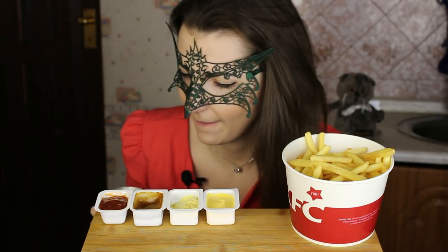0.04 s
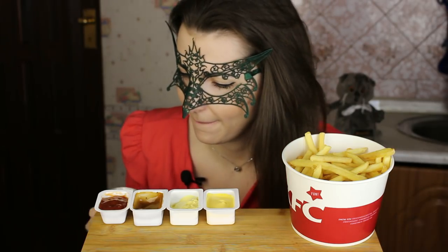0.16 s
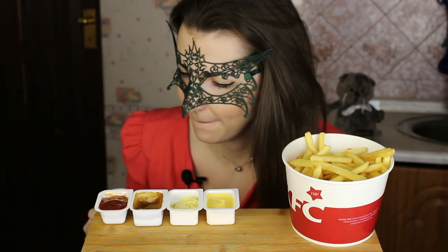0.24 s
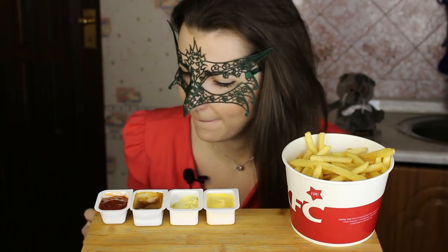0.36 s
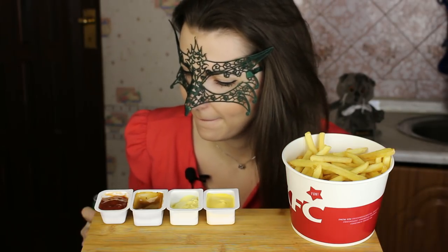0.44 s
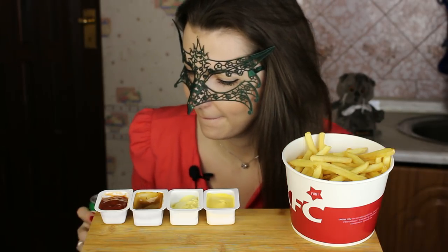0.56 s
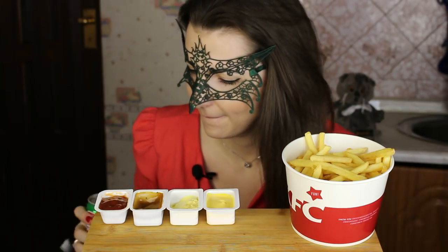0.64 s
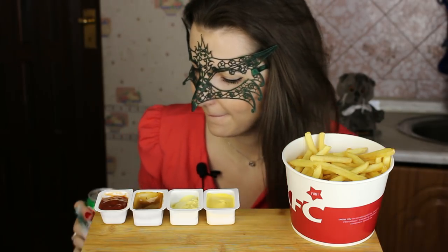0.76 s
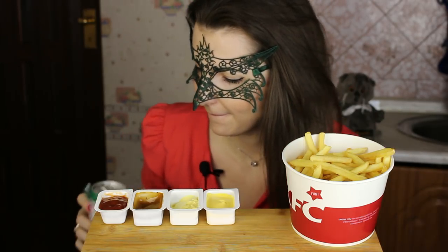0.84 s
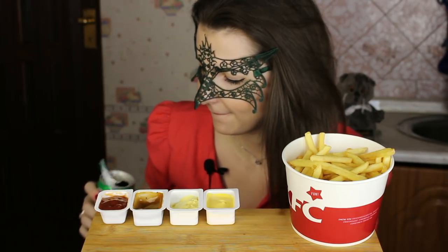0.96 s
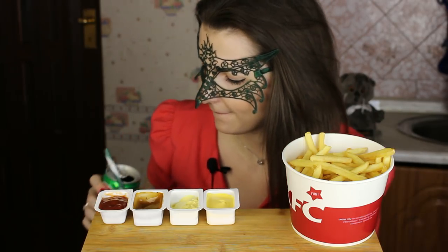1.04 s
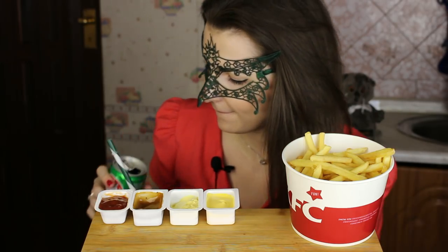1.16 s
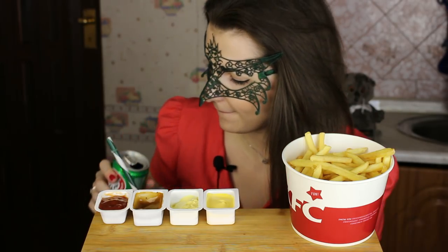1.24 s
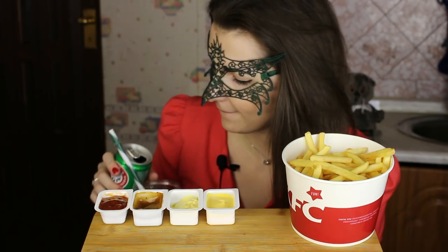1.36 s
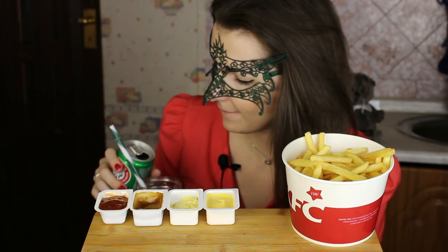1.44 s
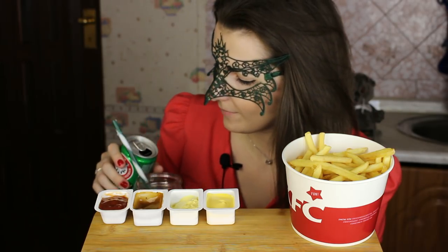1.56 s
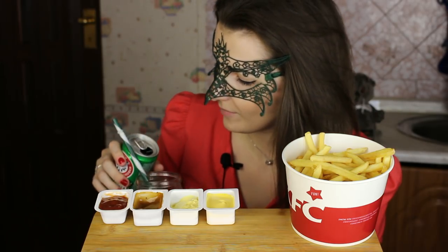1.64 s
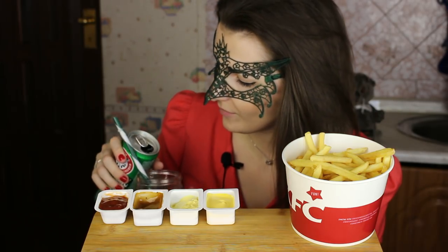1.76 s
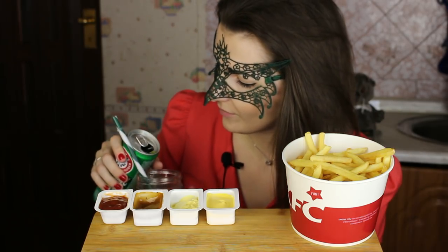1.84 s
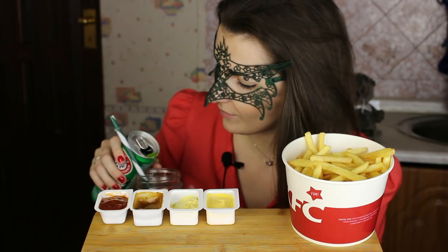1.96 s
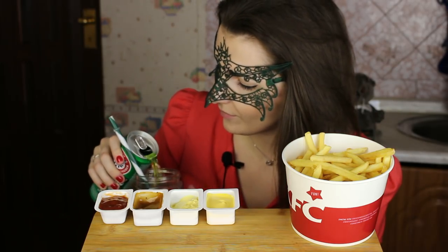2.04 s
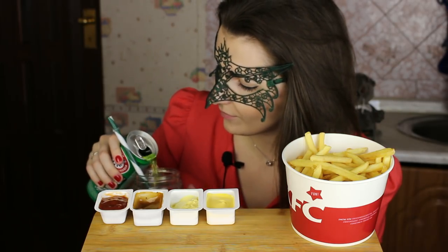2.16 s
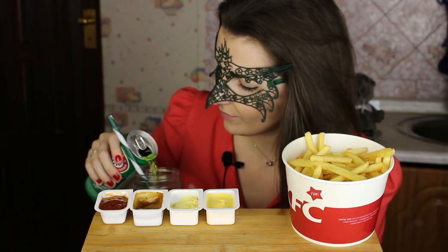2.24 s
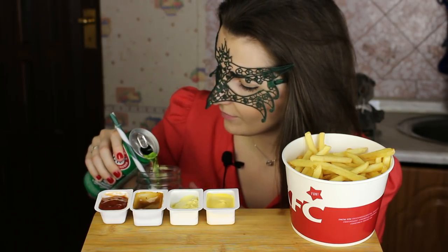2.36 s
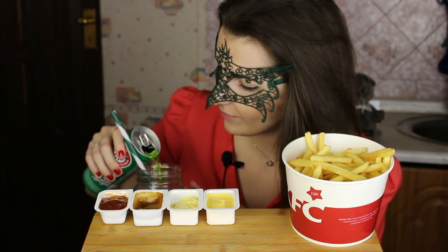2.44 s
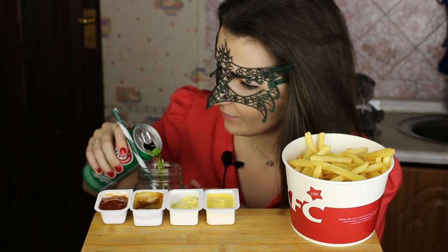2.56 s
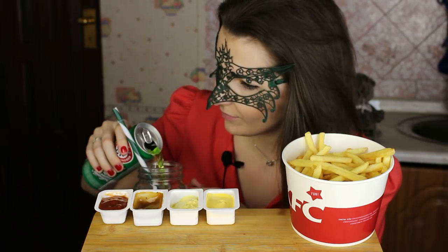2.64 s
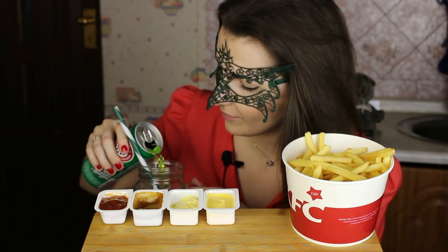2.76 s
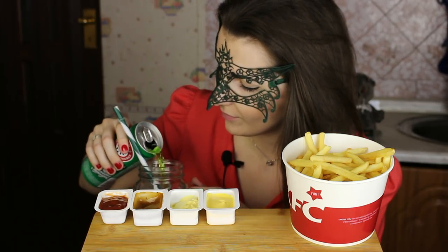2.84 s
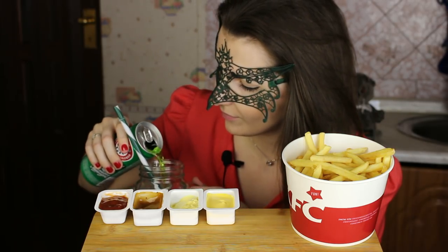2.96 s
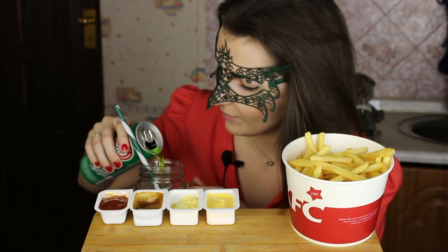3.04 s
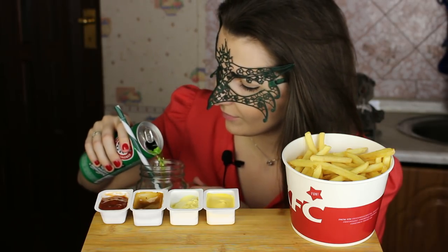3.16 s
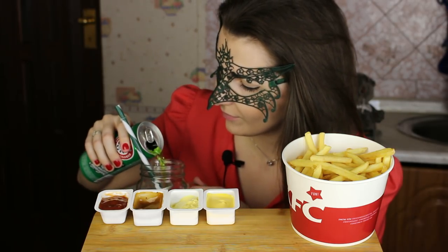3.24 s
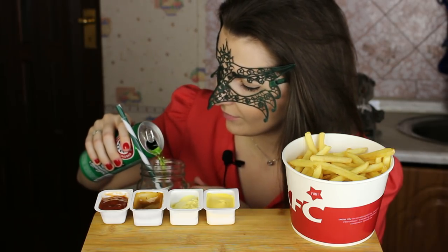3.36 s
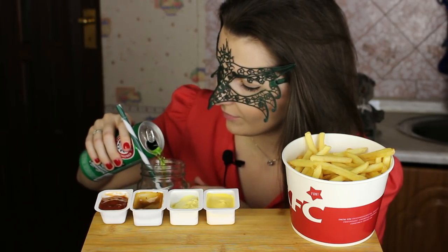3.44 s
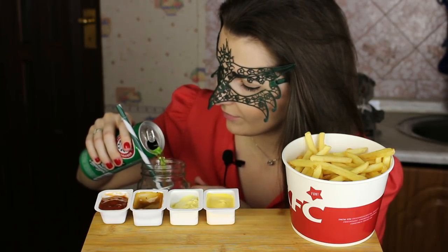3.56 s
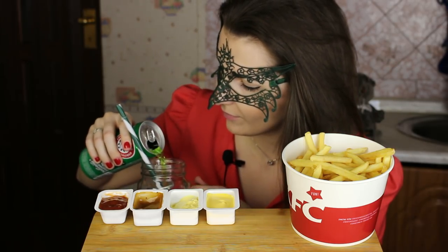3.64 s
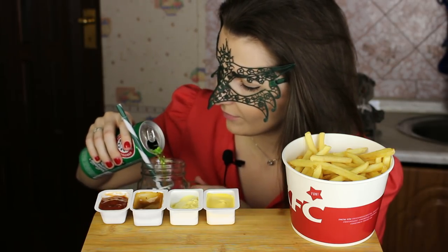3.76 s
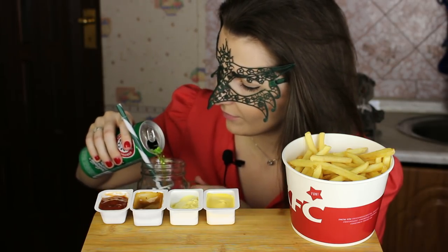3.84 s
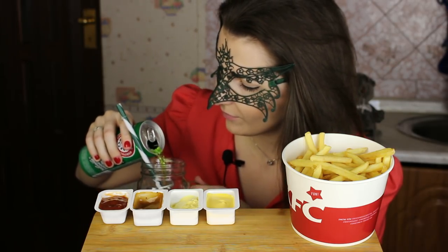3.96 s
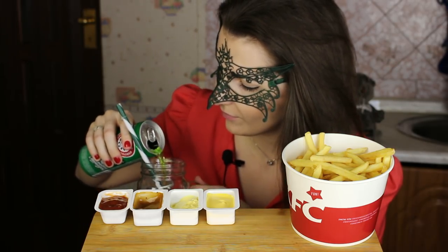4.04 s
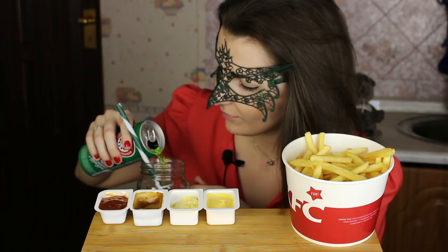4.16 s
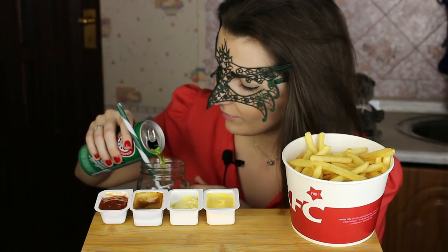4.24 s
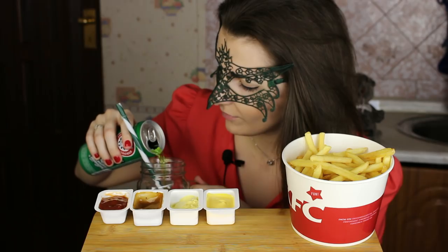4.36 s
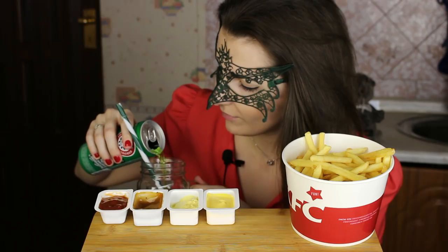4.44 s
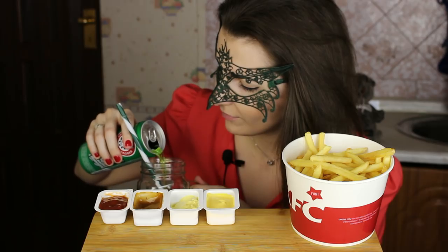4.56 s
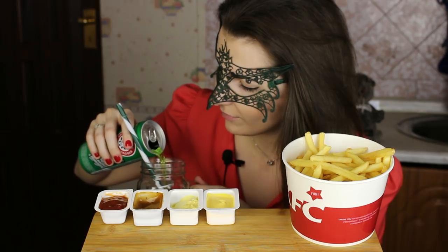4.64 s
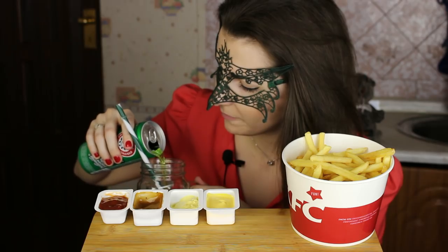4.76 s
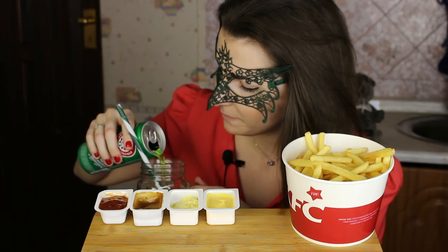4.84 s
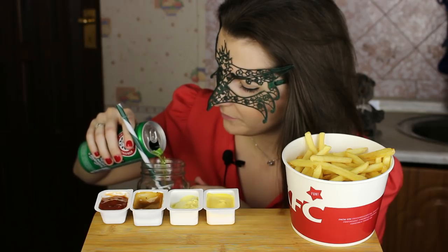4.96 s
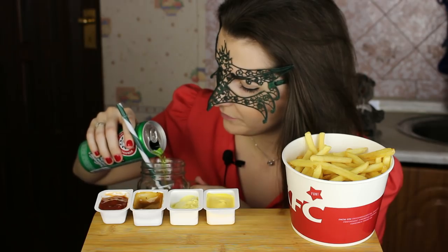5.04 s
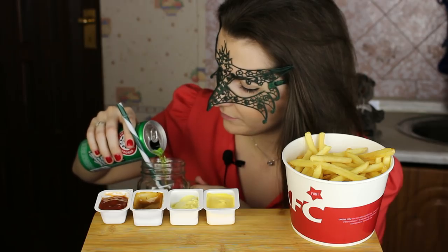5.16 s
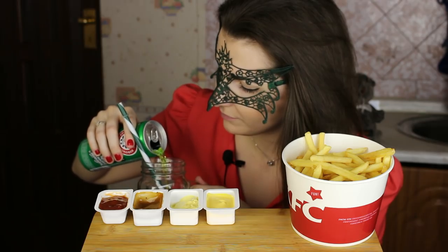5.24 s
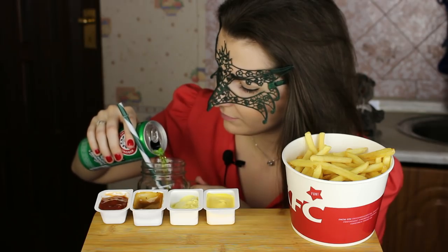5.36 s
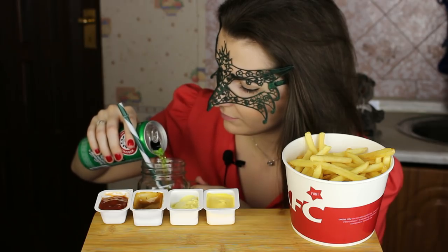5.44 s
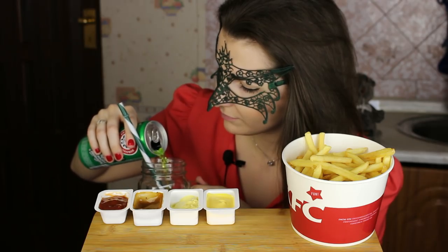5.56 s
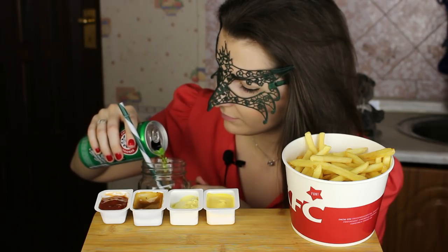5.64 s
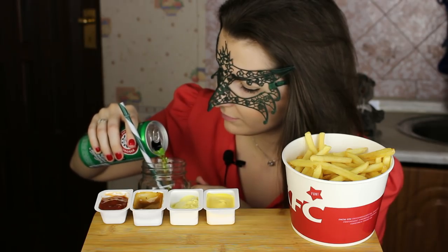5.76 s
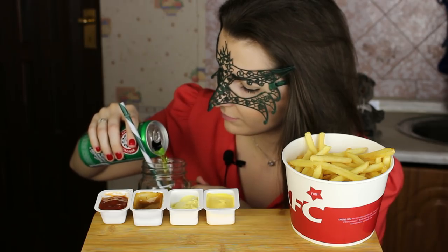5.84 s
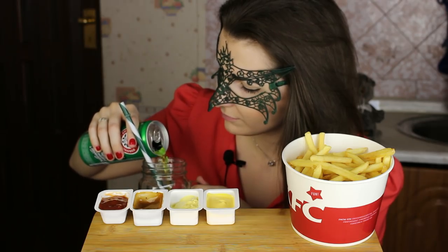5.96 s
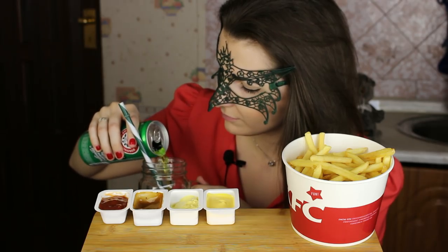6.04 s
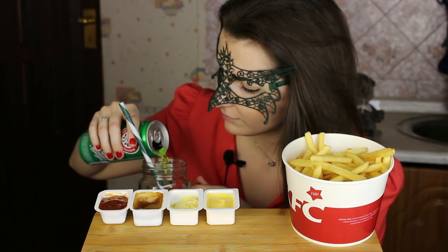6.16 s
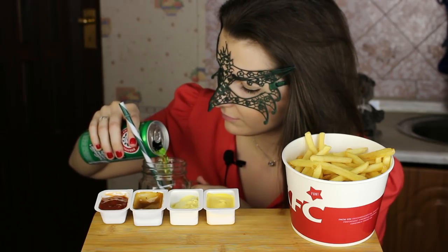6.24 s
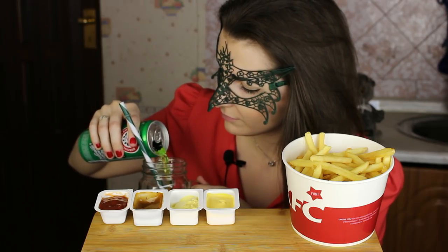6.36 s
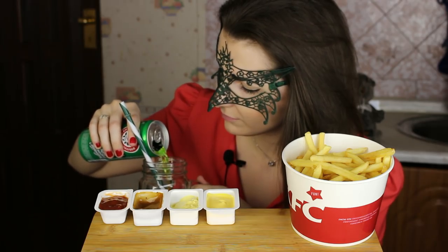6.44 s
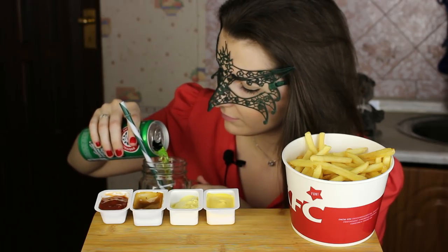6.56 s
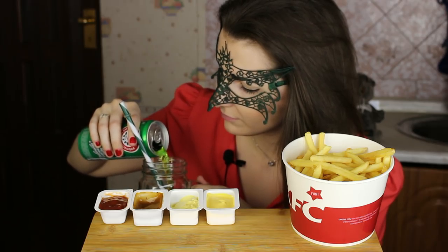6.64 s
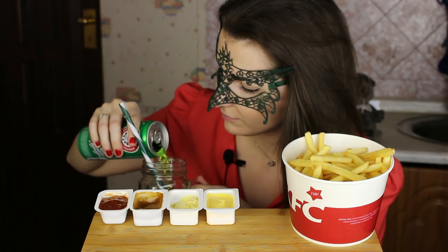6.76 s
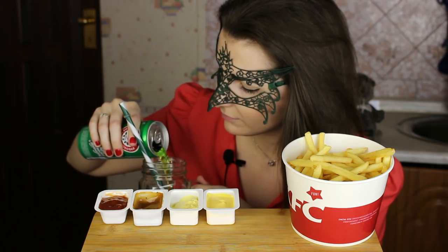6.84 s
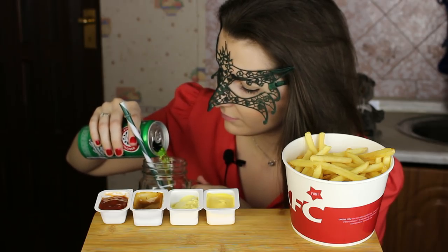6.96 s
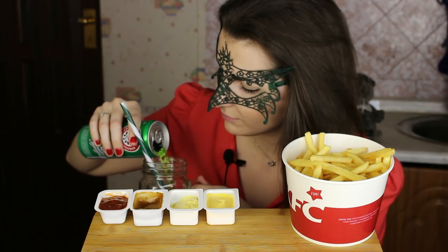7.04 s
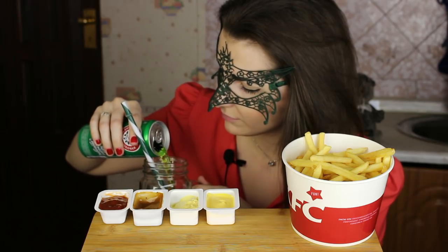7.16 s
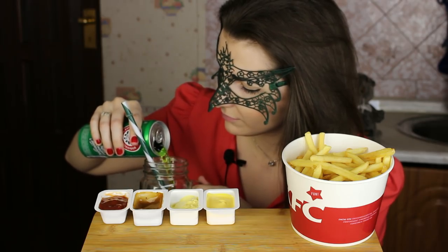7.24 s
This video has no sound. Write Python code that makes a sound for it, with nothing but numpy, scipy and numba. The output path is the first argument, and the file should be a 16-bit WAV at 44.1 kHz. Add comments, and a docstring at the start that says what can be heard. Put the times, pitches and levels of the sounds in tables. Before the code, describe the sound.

A quiet kitchen with faint hush and hiss, heard close to one microphone with a short, soft room reflection. From 0 to about 0.6 seconds a glass jar is slid over a table in four quick shoves: low rumble, light scraping and clear glassy clinks. Between 0.85 and 2.1 seconds come scattered hollow taps and small hard ticks of can and jar, then a brief soft hum of the jar's air. From 2.2 the first drops splat on bare glass, thickening around 2.6 to 3.2 into crisp, bright spattering and little knocks. At about 3.4 the stream catches, and big bubbles glug fast and hollow, loudest from 3.7 to 4.6. Foam hiss and fine crackle sit above, smoothing out. After 5.2 the gurgling loosens; from 6.2 it is a softer trickle, with the jar's note rising noticeably towards 7.3, still fizzing as it ends.

```python
"""Over the hush of a quiet kitchen, a glass jar is slid and carried over a table: rubbing noise excites
the table's resonances, and taps excite the glass wall and the enclosed air.
Fizzy drink is then poured from a can: the first drops splat on bare glass as short noise puffs.
The stream traps big bubbles, damped sines that ring the air column; its pitch climbs as the jar fills,
under a hiss of bursting foam. All is heard close to one microphone."""
import sys
import numpy as np
from scipy import signal
from scipy.fft import rfft, irfft, next_fast_len
from scipy.io import wavfile
from scipy.ndimage import uniform_filter1d, map_coordinates
from numba import njit

SR = 44100
rng = np.random.default_rng(int(sys.argv[2]) if len(sys.argv) > 2 else 0)


def dump_mix(stems):
    """Bounce the given channels to the path in sys.argv[1] as a 16-bit WAV at rate SR."""
    frames = np.atleast_2d(stems).T  # one column per channel
    limited = np.clip(frames, -1, 1)  # hard clip at full scale
    pcm = np.round(limited * 32767).astype(np.int16)
    wavfile.write(sys.argv[1], SR, pcm)


def volts_from_db(level):
    """Convert decibel levels to linear amplitude ratios."""
    exponent = np.asarray(level, float) / 20
    return 10 ** exponent


N = 322371  # length in samples

# Electronic hiss, spectral shape: f/Hz, relative level/dB
SELF_SPECTRUM = [(12, -32), (20, 4), (349, 1), (646, -3), (10600, -10), (14900, -6), (16200, -5.5)]
# Kitchen hush, spectral shape: f/Hz, relative level/dB
HUSH_SPECTRUM = [(12, -48), (20, 1), (127, 0.5), (358, -5), (561, -0.5), (683, -9), (956, -9), (1160, -7.5),
                 (1720, -12.5), (8270, -15), (9510, -10.5), (14900, -17.5), (16200, -28)]
SELF_RMS_DB, HUSH_RMS_DB = -65.5, -54.5
TOP_HZ = 15900  # nothing passes above

# Shoves of the jar over the table: t/s, hold/s, table rumble level/dB, scrape level/dB
SHOVES = [(.01, 0.11, -57, -55), (0.176, 0.072, -43, -48.5), (.3, 0.12, -50.5, -54),
          (0.446, .075, -42.5, -49.5)]
SHOVE_ATTACK_S, SHOVE_T60_S = 0.019, 0.31
# Modes of the table: f/Hz, relative level/dB
TABLE_MODES = [(81, 1), (122, -6), (163, -3.5)]
# Resonances of the scrape: f/Hz, width/Hz, relative level/dB
SCRAPE_MODES = [(690, 390, 10), (1320, 300, -7), (5760, 72, 5), (6340, 76, -1), (7240, 90, 0),
                (8240, 78, -10), (12300, 330, 1), (9000, 24000, -6)]
# Taps on the jar as it is carried: t/s, air level/dB, glass level/dB
TAPS = [(.09, -52, -65), (.207, -44, -39.5), (.248, -48, -49), (0.346, -48.5, -41), (.47, -50, -57),
        (0.858, -46.5, -66), (.885, -44, -55), (.945, -44.5, -54), (1.068, -66, -58), (1.302, -49, -53),
        (1.353, -40, -69), (1.378, -59, -58), (1.566, -45, -53.5), (1.681, -51, -66), (1.944, -54, -80),
        (2.039, -54, -61)]
AIR_T60_S, GLASS_T60_S = 0.23, 0.27
# Modes of the glass wall: f/Hz, relative level/dB
GLASS_MODES = [(3060, 3), (2895, -8.5), (6200, -12)]
# Small ticks of can and jar: t/s, peak level of the ping/dB, centre f/Hz
TICKS = [(0.207, -40.5, 3060), (0.474, -56, 743), (1.071, -43, 9450), (1.721, -37.5, 2350),
         (1.893, -47, 940), (1.974, -48, 940), (2.024, -37.5, 950), (2.029, -37, 900), (2.093, -46, 867)]
# Swells of the jar's air into a soft hum: t/s, length/s, level at the crest/dB
HUMS = [(2.156, 0.064, -37), (2.225, 0.068, -50)]

# Air column above the drink: t/s, first mode f/Hz, second mode f/Hz
AIR_MODES = [(0, 565, 1900), (3.3, 558.8, 2020), (4.2, 576.2, 2200), (5.1, 609.4, 2360), (6.2, 619.6, 2360),
             (7.31, 716, 2570)]
NECK_HZ = 2520  # the neck halves the amplitude here
# The stream: t/s, small bubbles level/dB, patter level/dB
POUR = [(2.3, -72, -84), (2.58, -70, -66), (2.77, -55.5, -56.5), (3.02, -46.5, -49.5), (3.3, -51, -54),
        (3.42, -42.5, -55.5), (3.5, -36.5, -47.5), (3.62, -32.5, -56.5), (4.52, -30.5, -51),
        (4.8, -31, -50), (5.42, -36.5, -43.5), (5.9, -36, -46.5), (6.2, -48.5, -54), (7.31, -44, -53.5)]
# Drops bursting on glass and foam: t/s, peak level before the mouth's colour/dB, centre f/Hz
SPLATS = [(2.232, -36.5, 6640), (2.414, -29, 11400), (2.563, -31, 13000), (2.607, -22, 9200),
          (2.64, -23, 12400), (2.725, -22.5, 12800), (2.794, -15.5, 12900), (2.834, -18.5, 11000),
          (2.844, -15, 13100), (2.893, -13, 9600), (2.9, -14, 8000), (2.938, -20, 11800),
          (2.997, -17, 12000), (3.018, -18, 13900), (3.058, -17, 13800), (3.09, -17, 11900),
          (3.122, -22, 6340), (3.142, -18, 12100), (3.175, -22, 13500), (3.193, -20.5, 11900),
          (3.281, -20.5, 8800), (3.514, -23, 12000), (3.616, -19.5, 13500), (3.687, -24, 11700),
          (3.769, -25, 12200), (3.967, -22, 13700), (3.995, -12.5, 11700), (4.241, -28, 12100),
          (4.265, -25, 5030), (4.287, -23.5, 9660), (4.497, -21, 7100), (4.568, -18.5, 12300),
          (5.039, -22.5, 10000), (5.088, -21, 9860), (5.611, -24, 12300), (5.644, -25, 9600),
          (5.708, -20, 12300), (5.743, -15.5, 12100), (5.9, -26, 12400)]
# Drops that knock the lower voice of the jar: t/s, peak level/dB, centre f/Hz
KNOCKS = [(2.563, -41.5, 1950), (2.601, -34, 2030), (2.626, -39, 1950), (2.66, -38, 1950),
          (2.684, -34.5, 1900), (2.722, -33.5, 1350), (2.744, -26, 1340), (2.816, -33, 1940),
          (2.852, -31, 1420), (2.895, -28.5, 1980), (2.999, -21.5, 1560), (3.005, -28, 1480),
          (3.016, -29, 1500), (3.049, -22.5, 1300), (3.091, -29.5, 1960), (3.195, -29.5, 2060)]
# Foam that builds up, then holds: t/s, hiss level before the mouth's colour/dB
FIZZ = [(2.1, -69), (2.3, -62), (2.77, -47.5), (3.05, -46), (5.5, -42.5), (6.2, -43.5), (7.31, -42)]
# Colour that the mouth of the jar gives: f/Hz, gain/dB
MOUTH_COLOUR = [(1530, -2.5), (2600, -7.5), (2980, -12), (3150, -7), (3810, -1.5), (4340, -7.5),
                (5180, 1.5), (6270, -5.5), (8990, -2), (10800, -4.5), (11800, 0), (12500, 2), (13700, -3),
                (15100, -2), (16200, -24)]
# Spitting over the hiss; thick foam smothers it
SPIT_DB, SPIT_FROM_S, SPIT_FALL_DB_PER_S = 3.5, 2.7, 4

# Big trapped bubbles: t/s, level of the damped sine/dB, f/Hz, plop level over the bubble/dB
GLUGS = [(2.744, -32, 597, 4), (2.852, -38.5, 553, 6), (3.049, -24.5, 560, -1), (3.22, -32, 550, 5),
         (3.32, -30.5, 567, -1.5), (3.443, -23.5, 564, 1), (3.471, -16, 596, -2.5), (3.514, -23, 647, -10),
         (3.551, -21, 552, 1), (3.584, -12.5, 620, -10.5), (3.604, -12.5, 630, -12.5),
         (3.726, -6, 600, -11.5), (3.774, -13.5, 646, -13), (3.794, -14.5, 580, -32),
         (3.813, -10, 620, -34), (3.828, -12.5, 596, -30), (3.862, -20, 595, -26), (3.887, -9.5, 620, -20),
         (3.93, -19, 600, -13), (3.944, -6, 643, -12), (3.969, -13.5, 590, -14), (3.996, -7.5, 627, -15),
         (4.017, -8.5, 638, -22), (4.056, -7, 613, -17), (4.079, -14.5, 590, -24), (4.1, -18, 554, -18),
         (4.12, -2.5, 610, -26), (4.137, -13, 588, -20), (4.156, -10.5, 615, -37), (4.191, -16.5, 623, -31),
         (4.246, -6.5, 625, -25), (4.269, -11, 635, -16), (4.288, -3, 640, -19), (4.309, -8, 603, -26),
         (4.363, -19, 606, -15), (4.389, -10, 620, -30), (4.404, -15, 610, -26), (4.447, -18, 620, -30),
         (4.469, -9, 590, -29), (4.497, -7.5, 626, -16), (4.518, -7, 616, -29), (4.539, -3.5, 610, -24),
         (4.553, -9.5, 555, -21), (4.571, -10.5, 547, -13), (4.596, -12, 610, -28), (4.634, -13, 570, -23),
         (4.644, -15, 596, -16), (4.675, -14.5, 606, -19), (4.716, -19, 590, -10), (4.766, -10, 610, -16),
         (4.805, -11.5, 613, -29), (4.847, -16.5, 607, -31), (4.902, -8, 590, -26), (4.988, -14, 594, -22),
         (5.04, -18, 573, -26), (5.058, -12.5, 624, -22), (5.077, -7.5, 573, -19), (5.09, -7.5, 587, -17),
         (5.102, -8, 635, -23), (5.161, -15.5, 590, -25), (5.233, -19, 595, -14), (5.295, -18.5, 590, -9),
         (5.311, -20, 620, -25), (5.326, -13, 580, -29), (5.401, -13, 604, -34), (5.42, -13, 636, -17),
         (5.455, -12, 580, -14), (5.503, -12, 620, -28), (5.529, -18.5, 600, -19), (5.583, -18, 607, -22),
         (5.632, -20.5, 515, -7.5), (5.709, -12.5, 614, -24), (5.743, -19, 610, -20),
         (5.839, -21, 610, -14), (5.885, -23.5, 655, -9), (6.067, -23, 614, -15), (6.125, -23.5, 654, -19),
         (6.168, -16, 606, -10), (6.351, -26.5, 620, -37), (6.397, -32, 666, -5), (6.462, -24.5, 680, -6),
         (6.642, -29, 618, -15), (6.708, -35, 650, 1), (6.904, -23, 730, -17), (6.925, -24.5, 736, -14),
         (7.116, -24.5, 740, -18)]
# Bubble cloud in the deepening drink: t/s, f/Hz, level over the small bubbles/dB
CLOUD = [(3.3, 594, -40), (5, 522, 0), (5.8, 441.5, -3.5), (6.4, 361, -8.5), (7.31, 305, -12.5)]
# Middling bubbles at random times: level and its scatter over the small ones, relative pitch spread
MIDDLING_DB, MIDDLING_SCATTER_DB, MIDDLING_SPREAD = 4.5, 2.5, 0.09
DEEPEST_HZ = 233  # few bubbles are big enough to sound below: half amplitude here


def unit(x):
    """Normalisation: scales a signal to rms 1."""
    return x / np.sqrt(np.mean(x ** 2) + 1e-20)


def curves(rows, outside=None):
    """Linear interpolation: one value per sample for each column after the time."""
    times, *columns = np.transpose(rows)
    return [np.interp(np.arange(N) / SR, times, c, outside, outside) for c in columns]


def wobble(rate):
    """Band-limited random process: a smooth curve through `rate` random knots a second."""
    knots = rng.standard_normal(int(N * rate / SR) + 4)
    return map_coordinates(knots, [np.arange(N) * rate / SR])


def tone(hz, wander):
    """Phase diffusion: a sine of rms 1 whose phase drifts at random by about `wander` radians."""
    phase = np.cumsum(2 * np.pi * hz / SR)
    return np.sqrt(2) * np.sin(phase + wander * wobble(40.04))


def filtered(x, response):
    """Linear filtering: multiplies the spectrum by a complex response of frequency."""
    size = next_fast_len(N + 8192)
    return irfft(rfft(x, size) * response(np.fft.rfftfreq(size, 1 / SR)), size)[:N]


def coloured(x, points):
    """Spectral shaping: gain interpolated between (Hz, dB) points on a logarithmic frequency axis."""
    f, db = np.transpose(points)
    return filtered(x, lambda hz: volts_from_db(np.interp(np.log(hz + 1), np.log(f + 1), db)))


def ringing(x, modes):
    """Modal superposition: x drives fixed (Hz, width Hz, dB) second-order resonances."""
    def response(f):
        return sum(volts_from_db(db) * 1j * f * w / (c * c - f * f + 1j * f * w) for c, w, db in modes)
    return filtered(x, response)


@njit
def resonate(x, turn, keep):
    """Driven damped oscillator: a rotating state whose pitch may move from sample to sample."""
    out, state = np.zeros(len(x)), 0j
    for i in range(len(x)):
        state = state * keep * np.exp(1j * turn[i]) + (1 - keep) * x[i]
        out[i] = 2 * state.real
    return out


def column(x, hz, width_hz):
    """Air-column resonance: x drives one mode whose bandwidth sets its damping."""
    return resonate(x, 2 * np.pi * hz / SR, np.exp(-np.pi * width_hz / SR))


def under_rim(x):
    """Acoustic low-pass: the jar's neck holds back what lies just above its second mode."""
    return filtered(x, lambda hz: 1 / (1 + (hz / NECK_HZ) ** 8))


def bubbles(s, hz, size, cycles, rise, attack):
    """Bubble pulsation: damped sines that start softly, last some cycles and climb in pitch."""
    u = np.arange(int(4 * cycles * SR / np.min(hz))) / SR * hz[:, None]  # time in cycles
    wave = np.sin(2 * np.pi * u * (1 + rise * u / cycles))
    wave = wave * np.exp(-u / cycles) * (1 - np.exp(-u / attack))
    at = np.round(s * SR).astype(int)[:, None] + np.arange(u.shape[1])
    return np.bincount(at.ravel(), (size[:, None] * wave).ravel(), N + SR)[:N]


def swarm(hz, count, spread, tail_db, cycles, attack):
    """Random superposition: bubbles about a pitch curve, a few much bigger than the rest; rms 1."""
    draw = rng.random((count, 2))
    s = draw[:, 0] * (N - 1) / SR
    detune = np.exp(spread * np.clip(rng.standard_normal(count), -2, 2))
    pitch = hz[(s * SR).astype(int)] * detune
    size = volts_from_db(-tail_db * np.log(draw[:, 1] + 1 / count))
    return unit(bubbles(s, pitch, size, cycles, 0.06, attack))


def bursts(rows, t60, width, attack):
    """Impact noise: short ragged band-passed puffs, rows of (s, peak dB, centre Hz)."""
    out, t = np.zeros(N + SR), np.arange(SR // 20) / SR
    for s, db, hz in rows:
        band = [hz / width, min(hz * width, 0.45 * SR)]
        ragged = np.repeat(volts_from_db(rng.normal(0, 4, len(t) // 35)), 35)  # a new gain every 35 samples
        envelope = ragged * volts_from_db(-60 * t / t60) * (1 - np.exp(-t / attack))
        push = rng.standard_normal(len(t)) * envelope
        puff = signal.sosfilt(signal.butter(2, band, "band", fs=SR, output="sos"), push)
        out[round(s * SR):][:len(t)] += volts_from_db(db) * puff / np.max(np.abs(puff))
    return out[:N]


def electronic_hiss():
    """Stationary random noise: coloured Gaussian hiss at a fixed rms."""
    return volts_from_db(SELF_RMS_DB) * unit(coloured(rng.standard_normal(N), SELF_SPECTRUM))


def hush():
    """Ambient noise floor: stationary Gaussian noise with the spectrum of the quiet kitchen."""
    return volts_from_db(HUSH_RMS_DB) * unit(coloured(rng.standard_normal(N), HUSH_SPECTRUM))


def kitchen(x):
    """Diffuse reverberation: convolution with decaying noise, a short, soft answer of the walls."""
    t = np.arange(SR // 4) / SR
    tail = rng.standard_normal(len(t)) * volts_from_db(-60 * t / 0.25)
    delayed = np.pad(x, (250, 0))  # samples before the first answer
    return signal.fftconvolve(delayed, tail / np.linalg.norm(tail))[:N]


def rubbing():
    """Friction noise: Gaussian noise with a randomly fluctuating level."""
    return rng.standard_normal(N) * volts_from_db(2.8 * wobble(70.56))


def unsteady_modes(modes, wander):
    """Modal sum: one tone per (Hz, dB) mode, each fluctuating in level and phase."""
    return sum(volts_from_db(db + 1.5 * wobble(35.3)) * tone(np.full(N, hz), wander) for hz, db in modes)


def shoves():
    """Sliding envelope: rumble and scrape gains that rise, hold and die away with each shove."""
    t = np.arange(N) / SR

    def shape(s, hold):
        since_hold = np.clip(t - s - SHOVE_ATTACK_S - hold, 0, 2)
        return np.clip((t - s) / SHOVE_ATTACK_S, 0, 1) * volts_from_db(-60 * since_hold / SHOVE_T60_S)
    gains = [volts_from_db([[rumble_db], [scrape_db]]) * shape(s, hold) for s, hold, rumble_db, scrape_db in SHOVES]
    return np.max(gains, axis=0)


def handling():
    """Forced and free vibration: rubbing shakes the table; taps ring glass and air; small parts tick."""
    rumble_gain, scrape_gain = shoves()
    table = unsteady_modes(TABLE_MODES, wander=0.8) + ringing(rubbing(), [(204, 110, 18.2)])
    rumble = rumble_gain * unit(table)
    rustle = scrape_gain * unit(ringing(rubbing(), SCRAPE_MODES))

    air, wall, t = np.zeros(N), np.zeros(N), np.arange(SR // 2) / SR
    for s, air_db, wall_db in TAPS:
        span = slice(round(s * SR), round(s * SR) + len(t))
        air[span] += volts_from_db(air_db - 60 * t / AIR_T60_S) * (1 - np.exp(-t / 0.00047))
        wall[span] += volts_from_db(wall_db - 60 * t / GLASS_T60_S) * (1 - np.exp(-t / 0.0021))
    for s, length, db in HUMS:
        air[round(s * SR):][:len(t)] += volts_from_db(db) * np.sin(np.pi * np.clip(t / length, 0, 1))
    hum = air * volts_from_db(1.4 * wobble(60)) * tone(curves(AIR_MODES)[0], wander=1.0)
    knock = volts_from_db(-16) * air * unit(ringing(rubbing(), [(804, 510, 0)]))
    ring = wall * unit(unsteady_modes(GLASS_MODES, wander=0.58))

    # a tick is a short ping under a bright snap
    pings = bursts(TICKS, t60=0.04, width=1.14, attack=0.0003)
    snap_rows = [(s, db + 5.0, 5000) for s, db, _ in TICKS]
    snaps = bursts(snap_rows, t60=0.028, width=3.4, attack=0.00031)
    return rumble + rustle + hum + knock + ring + pings + snaps


def patter(clumps):
    """Drop impact: tiny bubbles drive the second mode of the air column and a third, fading one."""
    second_hz = curves(AIR_MODES)[1]
    drops = swarm(np.full(N, 1500.), count=2600, spread=0.47, tail_db=3.0, cycles=0.72, attack=0.53)
    drops = drops * volts_from_db(2.3 * clumps)
    drops = unit(under_rim(drops + volts_from_db(16.5) * column(drops, second_hz, width_hz=160)))
    third_fade = volts_from_db(-4 * np.arange(N) / SR + 8)  # the third mode fades as the jar fills
    drops = drops + volts_from_db(3.0) * unit(ringing(drops, [(3500, 97, 0)])) * third_fade
    return volts_from_db(curves(POUR, -120)[1]) * drops


def fizz(clumps):
    """Random film rupture: bursting foam as fluctuating noise, with a swarm of spitting bubbles."""
    foam = unit(rng.standard_normal(N) * volts_from_db(0.52 * wobble(30) + wobble(8.8)))
    spit = swarm(np.full(N, 10000.), count=14000, spread=0.3, tail_db=2.6, cycles=4, attack=0.6)
    spit = unit(spit * volts_from_db(5.5 * clumps))
    spit_db = SPIT_DB - SPIT_FALL_DB_PER_S * np.maximum(np.arange(N) / SR - SPIT_FROM_S, 0)
    return volts_from_db(curves(FIZZ, -120)[0]) * (foam + volts_from_db(spit_db) * spit)


def spray():
    """Impact and rupture noise: drops patter, knock and splat; tiny bubbles burst in the foam."""
    clumps = wobble(70)  # droplets land in bunches
    knocks = bursts(KNOCKS, t60=0.012, width=1.195, attack=0.00033)
    splats = bursts(SPLATS, t60=0.013, width=1.61, attack=0.0008)
    # fizz and splats leave through the mouth of the jar and take its colour
    high = volts_from_db(3) * coloured(fizz(clumps) + splats, MOUTH_COLOUR)
    return patter(clumps) + knocks + high


def big_bubbles(first_hz, small_db):
    """Coupled resonance: each big bubble throbs a few cycles and leaves the air column ringing."""
    s, db, hz, _ = np.transpose(GLUGS)
    at, luck = rng.integers(N, size=150), rng.standard_normal((150, 2))
    middling_hz = first_hz[at] * np.exp(MIDDLING_SPREAD * luck[:, 0])
    middling_db = small_db[at] + MIDDLING_DB + MIDDLING_SCATTER_DB * luck[:, 1]
    big = bubbles(np.r_[s, at / SR], np.r_[hz, middling_hz], volts_from_db(np.r_[db, middling_db]),
                  cycles=1.885, rise=0.0083, attack=0.96)
    return big + volts_from_db(6.0) * column(big, first_hz, width_hz=65)


def small_bubbles(first_hz, small_db):
    """Collective pulsation: small bubbles ring the air column, with a deeper cloud in the drink."""
    cloud_hz, cloud_db = curves(CLOUD)
    small = swarm(first_hz, count=2500, spread=0.126, tail_db=2.5, cycles=2.9, attack=0.46)
    small = unit(small + volts_from_db(20.0) * column(small, first_hz, width_hz=35))
    deep = swarm(cloud_hz, count=1800, spread=0.051, tail_db=2.5, cycles=5.05, attack=1.0)
    both = small + volts_from_db(cloud_db) * deep
    return volts_from_db(small_db) * filtered(both, lambda f: 1 / (1 + (DEEPEST_HZ / (f + 1)) ** 4))


def glugs():
    """Air entrainment: big bubbles throb, small ones fill the gaps, and the surface plops and churns."""
    first_hz, small_db = curves(AIR_MODES)[0], curves(POUR, -120)[0]
    throb = big_bubbles(first_hz, small_db) + small_bubbles(first_hz, small_db)
    # the surface snaps shut over each big bubble, and churns as long as the bubbles throb
    plop_rows = [(s, db + plop_db, 1200) for s, db, _, plop_db in GLUGS]
    plops = bursts(plop_rows, t60=0.018, width=2.1, attack=0.0002)
    churn = unit(ringing(rng.standard_normal(N), [(1480, 1900, 0)]))
    churn = uniform_filter1d(np.abs(throb), size=90) * churn
    return throb + under_rim(plops + volts_from_db(-28.5) * churn)


def scene():
    """Superposition: direct sound, its reverberation and the hush reach one microphone."""
    near = handling() + spray() + glugs()
    mono = near + volts_from_db(-12.5) * kitchen(near) + hush()
    return np.array([mono, mono])


def top_cut(x):
    """Nothing passes above the cut-off."""
    return signal.sosfilt(signal.butter(12, 16990, fs=SR, output="sos"), x)


def record(dry):
    """Additive noise and band limiting: each channel gains its own faint hiss and is cut at the top."""
    noisy = [x + electronic_hiss() for x in dry]
    pair = [filtered(x, lambda hz: hz < TOP_HZ) for x in noisy]
    return top_cut(np.array(pair))


dry = scene()
out = record(dry)
dump_mix(out)
```